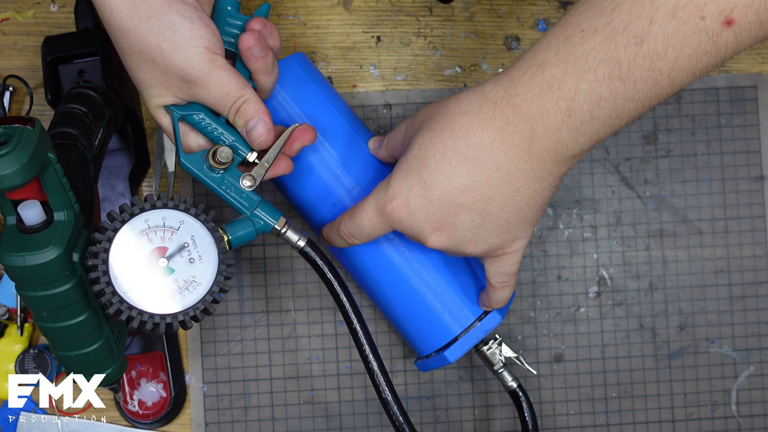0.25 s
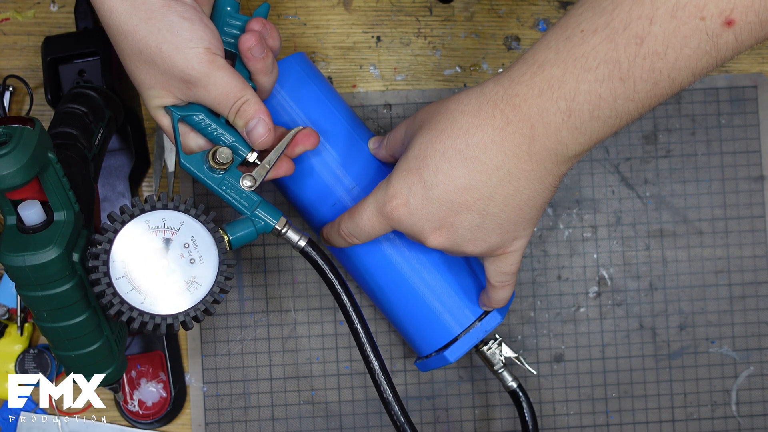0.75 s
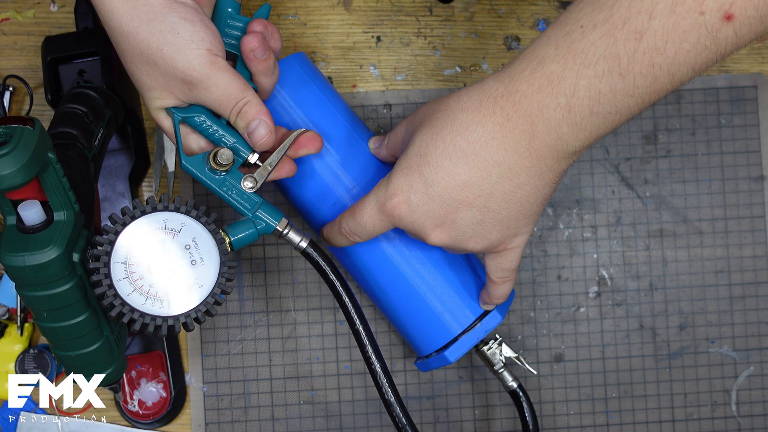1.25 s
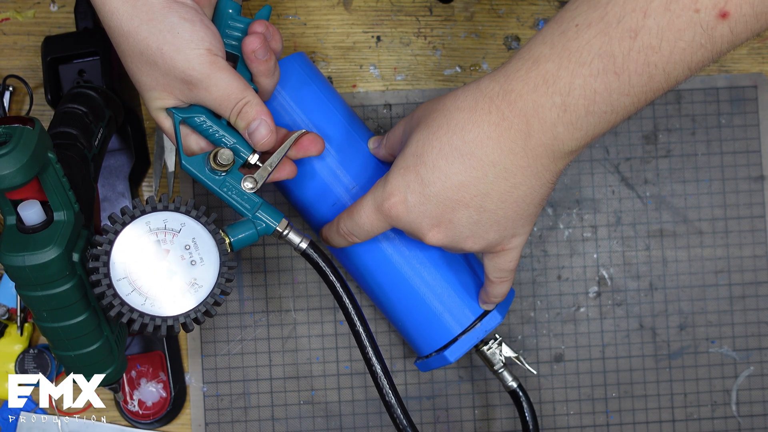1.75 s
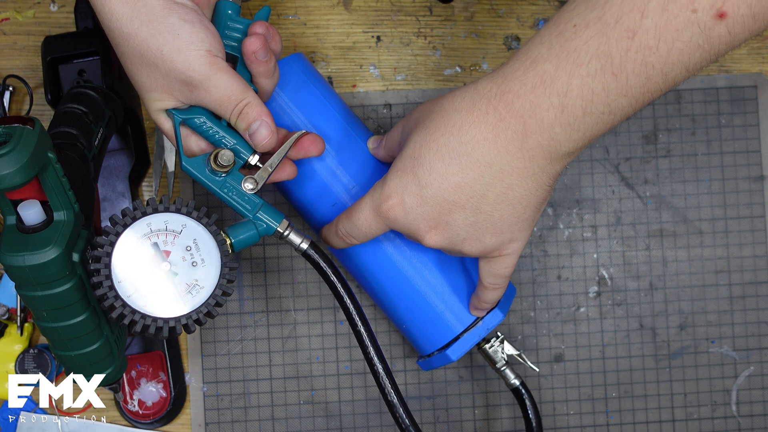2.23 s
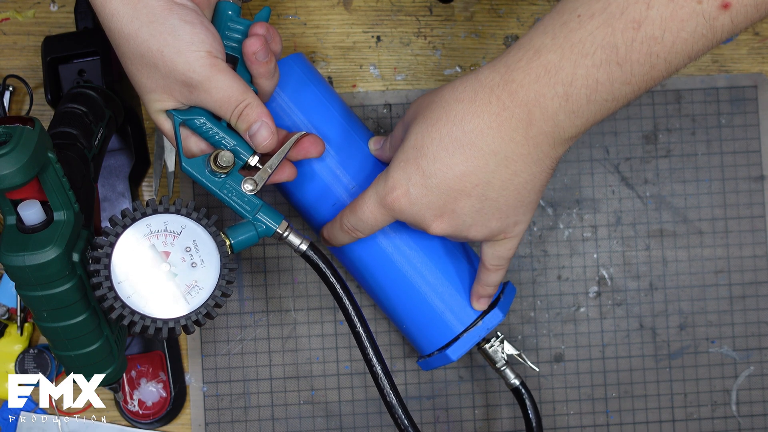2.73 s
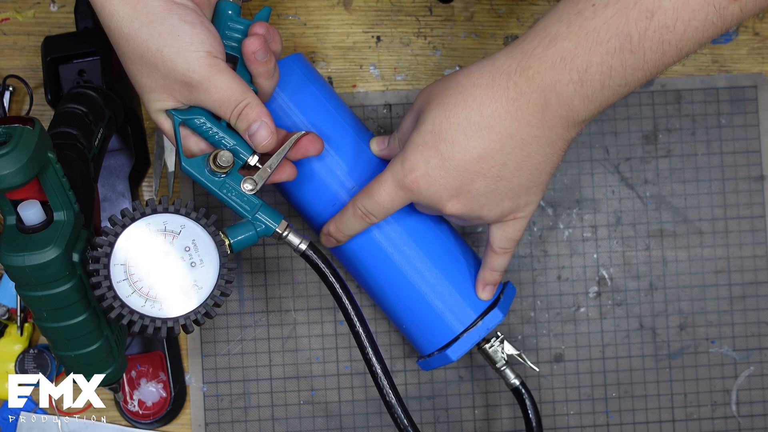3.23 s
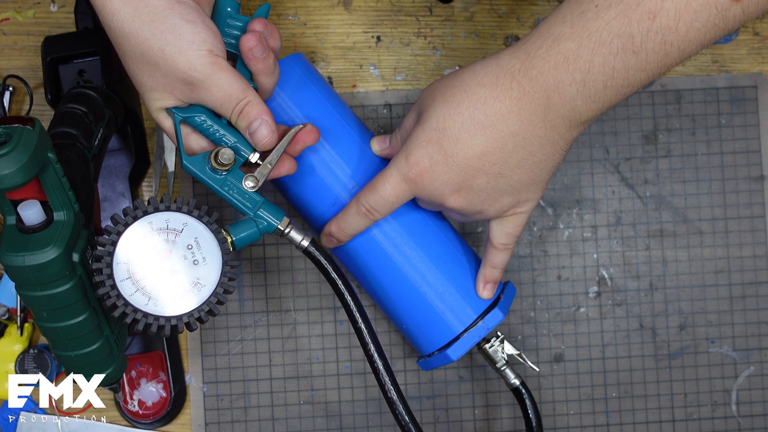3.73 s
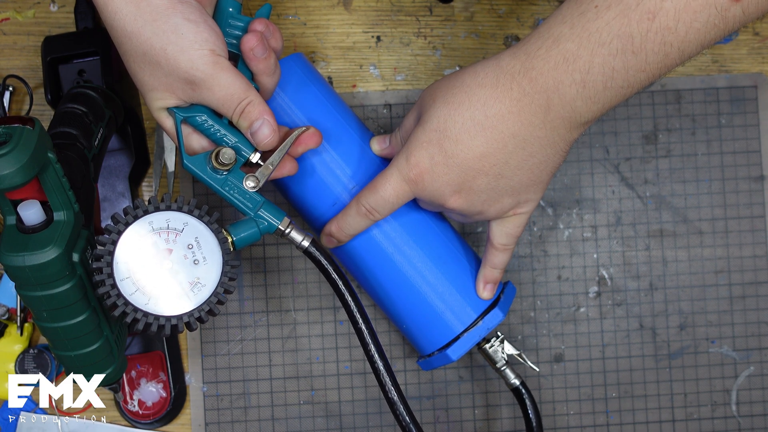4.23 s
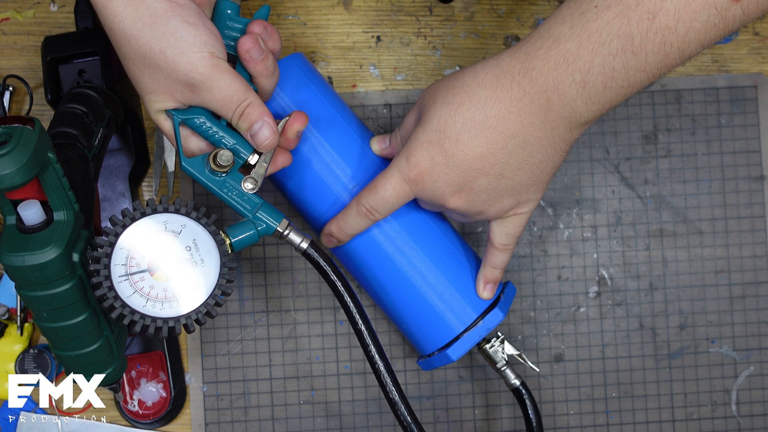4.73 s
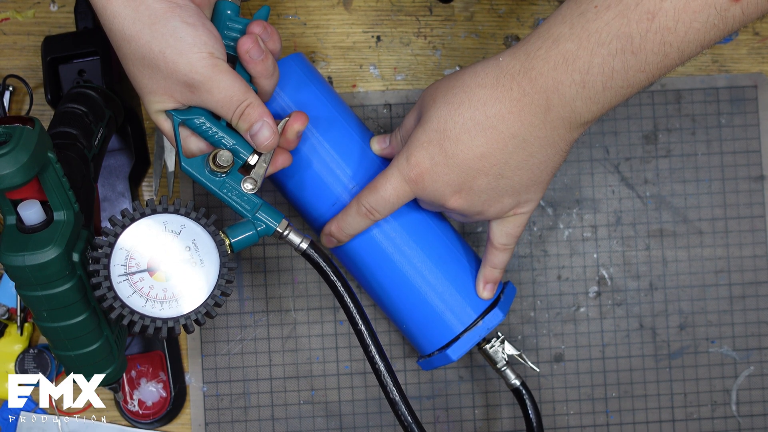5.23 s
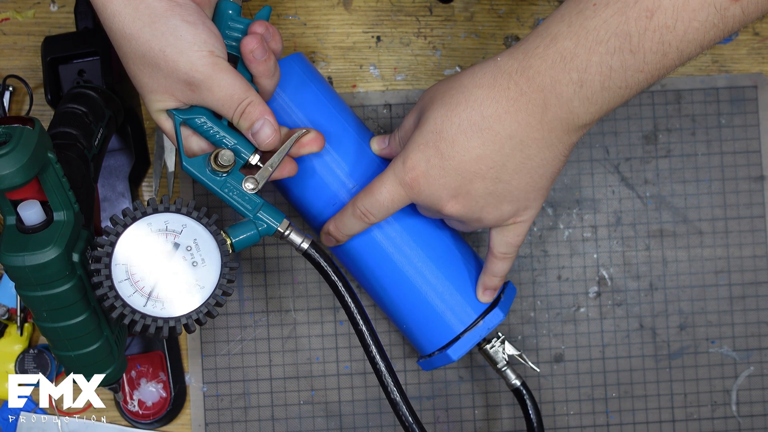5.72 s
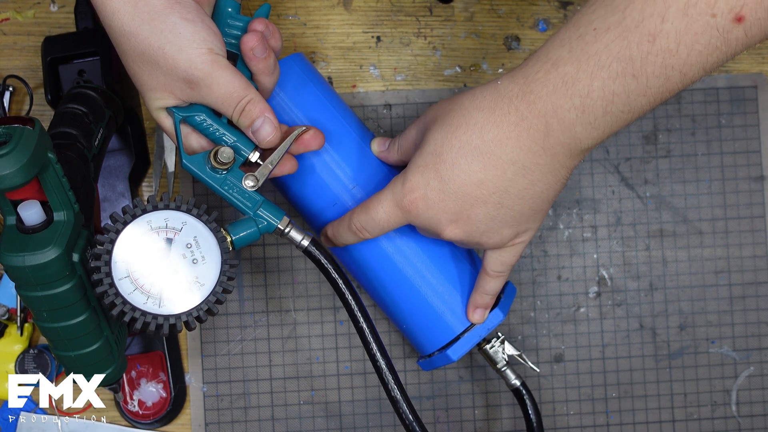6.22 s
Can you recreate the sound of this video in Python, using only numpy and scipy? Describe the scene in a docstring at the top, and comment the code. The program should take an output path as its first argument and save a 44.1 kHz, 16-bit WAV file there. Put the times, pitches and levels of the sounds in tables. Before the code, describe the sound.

Air gun puffs into a plastic cylinder, its end seal snaps loose, and air rushes out hissing, with wavering whistles, tiny buzzes and squeaks.

```python
"""Four short squirts of an inflator gun into a plastic cylinder, a pop as the end seal lets go, then air hissing
through the gap. The rubber lip shifts between several shapes and whistles on and off until the trigger is let go.
Squirts and hiss are noise through resonances, the pop is decaying sines, whistles and buzzes are tones.
The cylinder and a small workshop answer the squirts; a low lumpy rumble that drops when the hiss starts and a
room tone, both shaped noise, lie behind, heard close in stereo."""
import sys
import numpy as np
from scipy import signal
from scipy.fft import rfft, irfft, next_fast_len
from scipy.io import wavfile
from scipy.ndimage import uniform_filter1d, minimum_filter1d, map_coordinates

SR = 44100
rng = np.random.default_rng(int(sys.argv[2]) if len(sys.argv) > 2 else 0)


def put_to_file(sound):
    """Save the sound as 16-bit audio at rate SR, in the file named by the first command-line argument."""
    columns = np.atleast_2d(sound).T  # one column per channel
    safe = np.clip(columns, -1, 1)
    whole_steps = np.round(safe * 32767)
    wavfile.write(sys.argv[1], SR, whole_steps.astype(np.int16))


N = 285327
TIME = np.arange(N) / SR  # s

# the seal lets go: (t/s, level/dB)
SEAL_POP = [(1.1122, -5)]
# the lip buzzes cleanly: (start/s, length/s, f/Hz, level/dB)
BUZZES = [(3.452, 0.014, 1700, -22), (3.503, .027, 1696, -19.5), (3.641, 0.0077, 1700, -21.5)]


def amp(db):
    """Decibels to linear gain."""
    return 10 ** (np.asarray(db) / 20)


def unit(x):
    """Scale to rms 1."""
    return x / np.sqrt(np.mean(x ** 2) + 1e-20)


def along(points, hz):
    """Read (f/Hz, value) points on a log frequency axis."""
    f, v = np.transpose(points)
    return np.interp(np.log(hz + 1), np.log(f + 1), v)


def curves(rows):
    """One value per sample for each column after the time."""
    s, *cols = np.transpose(rows)
    return [np.interp(TIME, s, c) for c in cols]


def wobble(rate):
    """A smooth random curve, rate knots a second."""
    knots = rng.standard_normal(int(N * rate / SR) + 4)
    return map_coordinates(knots, [TIME * rate])


def gate(start, stop, rise, fall):
    """Opens from start over rise seconds, shuts from stop over fall seconds."""
    opening = np.clip((TIME - start) / rise, 0, 1)
    return opening * np.clip(1 + (stop - TIME) / fall, 0, 1)


def filtered(x, response):
    """Shape x by a gain that depends on frequency in Hz."""
    m = next_fast_len(N + 8192)
    spectrum = rfft(x, m) * response(np.fft.rfftfreq(m, 1 / SR))
    return irfft(spectrum, m)[..., :N]


def resonant(modes, broad, hz):
    """Gain of noise-driven resonances over a broad jet; powers add."""
    f = np.arange(0, SR / 2, 10.)
    # each peak is 6 dB down at the edges of its width
    peaks = sum(amp(2 * db) / (1 + (2 * (f - c) / w) ** 2) ** 2 for c, w, db in modes)
    bass_cut = f ** 8 / (f ** 8 + 1000.0 ** 8)  # a small gap radiates no bass
    return np.interp(hz, f, np.sqrt(peaks * bass_cut + amp(2 * broad(f))))


def rush(side_db, patchy_db):
    """White stereo noise whose gain varies in random patches of time and frequency."""
    z = signal.stft(rng.standard_normal((2, N)), nperseg=512)[2]
    field = uniform_filter1d(rng.standard_normal(z.shape[1:]), 4, 0)
    field = uniform_filter1d(field, 16, 1)
    mid, side = signal.istft(z * amp(patchy_db * unit(field)), nperseg=512)[1][:, :N]
    side = filtered(side, lambda hz: amp(along(side_db, hz)))
    return np.array([mid + side, mid - side])


def tone(hz):
    """A turning complex pointer whose real part is a sine of rms 1."""
    return np.sqrt(2) * np.exp(2j * np.pi * np.cumsum(hz) / SR)


def unsteady(blur_hz, fuzz, rate):
    """Turbulence on a tone: its pitch wanders and close noise blurs it."""
    level = unit(1 + fuzz * wobble(rate))
    wander = 2 * np.pi * np.cumsum(blur_hz * wobble(50)) / SR
    return level * np.exp(1j * (wander + fuzz * wobble(rate)))


def leak():
    """Turbulent jet at the gap, cross-fading from one lip shape to the next; a buzzing lip chokes it."""
    # the jet's start, then the middle of each change of shape, the last as the trigger is let go:
    # (t/s, change takes/s, jet level/dB)
    shifts = [(1.11, 0.0046, -14.5), (1.8, 0.088, -15), (2.36, 0.3, -15), (2.78, 0.5, -14),
              (3.5, 0.11, -15.5), (3.8, .08, -14.5), (4.6, 0.51, -15), (5.99, .06, -18.5)]
    # resonances, one list per lip shape: (f/Hz, width/Hz, level/dB)
    lip_modes = [
        [(1584, 280, -7), (3620, 570, 3.5), (5100, 610, -0.5), (6100, 180, -9), (6200, 170, -3),
         (7460, 430, -1.5), (8760, 250, -3.5), (10100, 900, -12), (11660, 350, -13), (12510, 840, -15.5),
         (15060, 900, -20)],
        [(1790, 700, -3), (2660, 210, -1), (3530, 480, 2.5), (4860, 1500, -0.5), (6140, 260, -3),
         (6670, 130, -11), (7450, 370, -0.5), (8650, 280, -15), (10060, 700, -10), (12300, 900, -13),
         (14960, 600, -15)],
        [(1800, 520, -5.5), (2600, 840, -4), (3380, 170, -1), (5100, 1040, 2.5), (6560, 220, -2),
         (7370, 400, -1.5), (8660, 550, 3), (9410, 280, -4), (10070, 1070, 2.5), (12750, 1000, -7),
         (15090, 770, -8)],
        [(1910, 420, 0), (2830, 200, -1.5), (3420, 270, -1), (4900, 1700, -0.5), (6870, 510, -3),
         (7490, 250, -4), (8660, 330, -16), (9940, 890, -4.5), (11390, 280, -15), (12500, 310, -11),
         (15040, 280, -23)],
        [(1940, 490, -4), (2890, 160, 0), (3400, 290, -2), (4350, 190, -2), (5160, 570, 1.5),
         (6170, 1600, -2.5), (7750, 750, -9), (9240, 480, -9), (10000, 780, -4), (12700, 530, -10),
         (14080, 130, -20)],
        [(1876, 430, -3.5), (3700, 340, -6), (4810, 110, -43), (6000, 1400, -4.5), (7700, 240, -5.5),
         (8600, 340, -8), (10200, 630, -13), (11430, 270, -17), (12700, 170, -11)],
        [(1790, 440, -2), (3490, 320, 5), (3760, 420, 3.5), (4770, 170, -6), (5500, 1150, -1), (6180, 1300, -1),
         (7740, 1500, -2.5), (10020, 490, -4), (11360, 450, -9), (12970, 1300, -10)],
        [(3230, 480, -1), (4670, 500, -1), (5740, 1400, -1), (6700, 510, -5), (7380, 510, 0.5), (8370, 870, 0),
         (9980, 1160, 3.5), (12000, 1000, -8), (12900, 1200, -4), (15130, 1400, -7)],
    ]
    # broad jet of each shape: (level/dB, tilt/dB per octave)
    shape_jets = [(-4.5, 0), (-3, -1.3), (-4.5, -1.8), (-4, -0.3), (-5, 0.8), (-6, 0.3), (-3, -2.08),
                  (-6, -6)]
    # jet spectrum common to all shapes: (f/Hz, relative level/dB)
    jet_spectrum = [(30, -68), (80, -66), (150, -62.5), (300, -46), (600, -29), (850, -21), (1200, -13.5),
                    (1700, -10), (2500, -3.5), (4000, 2), (6500, -5.5), (10300, -3), (11000, -14.5),
                    (13000, -15), (15800, -14)]
    # stereo spread: (f/Hz, side minus mid/dB)
    jet_width = [(60, -8), (110, -8), (200, -13), (380, -37), (700, -54), (1290, -101), (2380, -27),
                 (4400, -12), (8120, -13), (15000, -9.5)]
    air = filtered(rush(jet_width, patchy_db=.9), bench)
    shape = sum(np.clip((TIME - s) / takes + .5, 0, 1) for s, takes, _ in shifts[1:])
    hiss = 0
    for k, (modes, (db, tilt)) in enumerate(zip(lip_modes, shape_jets)):
        broad = lambda hz: along(jet_spectrum, hz) + db + tilt * np.log2((hz + 1) / 5000)
        voiced = unit(filtered(air, lambda hz: resonant(modes, broad, hz)))
        hiss = hiss + voiced * np.clip(1 - abs(shape - k), 0, 1)
    level_db = np.interp(shape, np.arange(len(shifts)), [db for *_, db in shifts])
    flutter_db = 0.51 * wobble(30) + 0.34 * wobble(5.3)
    start = np.clip((TIME - SEAL_POP[0][0]) / shifts[0][1], 0, 1)
    jet = start * amp(level_db + flutter_db - 2.5 * buzzing()) * hiss
    # tools and walls close by return a spray of weak copies, t60 0.12 s
    near = rng.standard_normal(2600) * amp(-60 * np.arange(2600) / SR / .12)
    near = near / np.linalg.norm(near)
    return jet + amp(-11) * signal.fftconvolve(jet, near[None], axes=1)[:, :N]


def bench(hz):
    """Narrow dips where the bench's reflection cancels the direct sound."""
    # (f/Hz, width/Hz, depth 0-1)
    dips = [(1428, 250, 0.73), (4175, 240, 0.78)]
    return np.prod([1 - d / (1 + (2 * (hz - c) / w) ** 2) for c, w, d in dips], axis=0)


def whistle():
    """The lip's unsteady tones swell, glide to a settled pitch and die; they break off while the lip buzzes."""
    # (start/s, stop/s, swell/s, first f/Hz, settled f/Hz, glide/s, level/dB, octave level/dB,
    #  pitch wander/Hz, fuzz 0-1)
    whistles = [(1.778, 2.327, 0.036, 2184, 1827, .13, -30, -34, 25, 0.5),
                (3.349, 3.845, 0.13, 2020, 1969, 0.46, -26, -41, 12, 0.15),
                (4.52, 5.948, 0.23, 1865, 1708, 1.15, -26, -20, 13.99, 0.17)]
    out = 0
    for a, b, swell, first_hz, settled_hz, glide, db, octave_db, blur_hz, fuzz in whistles:
        sag = np.sin(np.pi / 2 * np.clip((TIME - a) / glide, 0, 1)) ** 2
        pitch_hz = first_hz + (settled_hz - first_hz) * sag
        turn = tone(pitch_hz) * unsteady(blur_hz, fuzz, rate=150)
        # squaring the pointer doubles its pitch; the octave is blurred more
        doubled = turn ** 2 / (abs(turn) + .1)
        octave = unit((doubled * unsteady(0, .17, rate=400)).real)
        effort = gate(a, b, swell, fall=0.036)
        # effort counts twice on the octave, so it fades in and out more steeply
        out = out + effort * (amp(db) * turn.real + amp(octave_db) * effort * octave)
    return out * (1 - buzzing())


def buzzing():
    """1 while the lip buzzes, else 0, with soft edges."""
    return np.clip(sum(gate(s, s + length, .003, 0.0033) for s, length, _, _ in BUZZES), 0, 1)


def lip_buzz():
    """Short clean buzzes of the lip: a steady fundamental and its harmonics."""
    # (multiple of the pitch, level/dB)
    harmonics = [(1, -4), (2, 1), (3, 1), (4, 3), (5, 1)]
    out = 0
    for s, length, hz, db in BUZZES:
        buzz = sum(amp(db + g) * np.sin(2 * np.pi * k * hz * TIME) for k, g in harmonics)
        out = out + gate(s, s + length, .003, 0.0038) * buzz
    return out


def squeaks():
    """Short thin gliding tones that share one unsteadiness."""
    # (start/s, stop/s, start f/Hz, stop f/Hz, level/dB)
    glides = [(3.707, 3.807, 2960, 2935, -24.5), (3.71, 3.83, 4820, 4880, -36),
              (3.733, 3.805, 5760, 5860, -28), (3.8, 3.874, 3426, 3400, -22),
              (3.871, 3.923, 2990, 3290, -21), (3.826, 3.864, 8050, 8000, -21),
              (4.36, 4.407, 7200, 7330, -26.5)]
    shaky = unsteady(18, .45, rate=200)
    out = 0
    for a, b, from_hz, to_hz, db in glides:
        glide = tone(np.interp(TIME, (a, b), (from_hz, to_hz)))
        out = out + gate(a, b, 0.018, 0.015) * amp(db) * (shaky * glide).real
    return out


def drone():
    """A low soft unsteady tone that sinks in pitch."""
    # (t/s, f/Hz, level/dB)
    drone_path = [(1.22, 1135, -42), (1.45, 1110, -44.5), (1.72, 1085, -39.5), (1.799, 1000, -44)]
    hz, db = curves(drone_path)
    sound = (unsteady(8.2, 0.41, rate=120) * tone(hz)).real
    return gate(drone_path[0][0], drone_path[-1][0], .03, 0.027) * amp(db) * sound


def gun():
    """Each pull opens fast, then the hose pressure bleeds away; the later two are thinner around 3.4 kHz."""
    # trigger pulls, each with its own body gain: (open/s, level/dB, body gain/dB)
    pulls = [(-.06, -18.5, 1.5), (0.244, -19.5, -1), (0.663, -21.5, -6), (0.977, -21.5, -5)]
    # resonances of valve and hose: (f/Hz, width/Hz, level/dB)
    gun_modes = [(1710, 140, -8), (1810, 30, -5), (2140, 120, -25), (2575, 45, -9), (2810, 130, -16),
                 (3155, 45, 1), (3310, 230, 1), (3590, 120, 2), (4070, 160, -16), (4300, 240, -15),
                 (5125, 35, -8), (5290, 130, -13), (5920, 180, -11), (6550, 150, -1), (6800, 290, -3),
                 (7370, 280, 5), (8040, 250, -3), (8440, 140, 3), (9060, 270, -2), (9740, 210, -1),
                 (10330, 430, -9), (10890, 120, -1), (11170, 210, -10), (11620, 340, -11), (12320, 470, -8),
                 (12890, 170, -10), (13250, 470, -11), (13880, 170, -10), (14400, 220, -13),
                 (14760, 240, -14)]
    # jet between the resonances: (f/Hz, relative level/dB)
    gun_jet = [(300, -41.5), (1200, -31), (2300, -54), (4500, -18.5), (7500, -27), (11000, -29),
               (16000, -21)]
    open_s, held_s, bleed_t60_s = .03, 0.11, 0.21  # valve opening, trigger held, hose bleeding off
    air = rush([(1000, -11), (2500, -41), (5000, -7), (14000, -29)], patchy_db=1.5)
    hiss = unit(filtered(air, lambda hz: resonant(gun_modes, lambda f: along(gun_jet, f), hz)))
    body = filtered(hiss, lambda hz: 1 / (1 + ((hz - 3400) / 700) ** 4))  # band around 3.4 kHz
    out = 0
    for s, db, body_db in pulls:
        bleed = amp(-60 * np.clip(TIME - s - held_s, 0, None) / bleed_t60_s)
        flow = np.clip((TIME - s) / open_s, 0, 1) * bleed
        out = out + amp(db) * flow * (hiss + (amp(body_db) - 1) * body)
    return out


def cylinder(x):
    """The cylinder's air: narrow resonances that gather slowly and outlast the squirts that drive them."""
    # (f/Hz, level/dB, t60/s)
    air_modes = [(1810, 1, .3), (2575, -2, .28), (3155, 5, .4), (5125, 3, .35)]

    def response(f):
        total = 0
        for hz, db, t60 in air_modes:
            width = np.log(1000) / (np.pi * t60)  # Hz; a longer ring is narrower
            total = total + amp(db) * 1j * f * width / (hz * hz - f * f + 1j * f * width)
        return total
    return filtered(x, response)


def pop():
    """The seal's release knocks the end cap, which rings in a few fast-decaying sines."""
    # end cap: (f/Hz, level/dB, t60/s)
    cap_modes = [(1870, 6.5, 0.0065), (900, -14, 0.013), (252, -37, .04), (5200, -6, .008)]
    (s, db), = SEAL_POP
    t = np.clip(TIME - s, 0, None)
    ring = sum(amp(g - 60 * t / t60) * np.sin(2 * np.pi * hz * t) for hz, g, t60 in cap_modes)
    return amp(db) * (1 - np.exp(-t / 0.00035)) * ring


def shop(x):
    """Workshop reverb from decaying noise: each frequency dies at its own speed."""
    # (f/Hz, t60/s)
    shop_decay = [(500, 1), (2000, 0.42), (6000, 0.61), (14000, 0.5)]
    hz, t, z = signal.stft(rng.standard_normal((2, SR // 2)), SR, nperseg=256)
    decay = amp(-60 * t / along(shop_decay, hz)[:, None])
    tail = signal.istft(z * decay, SR, nperseg=256)[1]
    return signal.fftconvolve(x, tail / np.linalg.norm(tail[0]), axes=1)[:, :N]


def background():
    """A low lumpy rumble that drops when the hiss starts and a steady room tone, both shaped noise."""
    # level of the low rumble: (t/s, level/dB)
    rumble_level = [(0.0, -63.5), (1.08, -61), (1.12, -53), (1.3, -74), (2.7, -69), (3.55, -57),
                    (3.95, -65.5), (5.9, -78), (6.25, -59), (6.4, -63)]
    # rumble spectrum: (f/Hz, relative level/dB)
    rumble = [(25, -40), (60, -23), (150, -3.5), (260, -1), (420, -4.5), (700, -11), (1200, -58)]
    # room tone spectrum: (f/Hz, relative level/dB)
    room_tone = [(120, -53), (200, -5.5), (294, -20), (360, -13), (735, 2), (1230, 1.5), (3000, 4.5),
                 (7010, -5), (16000, -27)]
    rumble_db, = curves(rumble_level)
    low_noise = rush([(30, -12), (130, -4), (400, -8.0)], patchy_db=1.5)
    lumps = amp(2.1 * wobble(18)) * filtered(low_noise, lambda hz: amp(along(rumble, hz)))
    room_noise = rush([(300, -9.5), (10000, -33)], patchy_db=0.5)
    hush = filtered(room_noise, lambda hz: amp(along(room_tone, hz)))
    return amp(rumble_db) * unit(lumps) + amp(-57.5) * unit(hush)


def scene():
    """Mix the bench sounds, lean them left or right as the hands shift the parts, add the background."""
    # balance: (t/s, left minus right/dB)
    drift = [(0.0, 1.5), (2.0, 0.8), (2.99, 1.56), (5.39, 0.8), (6.47, 0.5)]
    drift_db, = curves(drift)
    squirts = gun()
    squirts = squirts + cylinder(squirts)
    lip_tones = whistle() + lip_buzz() + squeaks() + drone()
    bench_sounds = leak() + lip_tones + squirts + amp(-9.0) * shop(squirts) + pop()
    return bench_sounds * amp(drift_db * np.array([[.5], [-.5]])) + background()


def record(dry):
    """A fast limiter holds the peaks; then a deep bass cut, a slight left-right lean and a band limit."""
    # (f/Hz, left minus right/dB)
    lean = [(60, 0.0), (130, 0), (290, -0.5), (640, 0.5), (1410, -2.5), (3100, -1), (6820, -1),
            (15000, -0.5)]
    ceiling, react_s, top_hz = 0.75, 0.0017, 15800
    span = round(react_s * SR)
    needed = ceiling / np.maximum(abs(dry).max(axis=0), ceiling)
    # the gain drops ahead of each peak and moves smoothly
    held = dry * uniform_filter1d(minimum_filter1d(needed, 2 * span + 1), span)

    def colour(hz):
        bass_cut = hz ** 2 / (hz ** 2 + 50 ** 2)
        return amp(along(lean, hz) * np.array([[.5], [-.5]])) * bass_cut * (hz < top_hz)
    return filtered(held, colour)


dry = scene()
out = record(dry)
put_to_file(out)
```